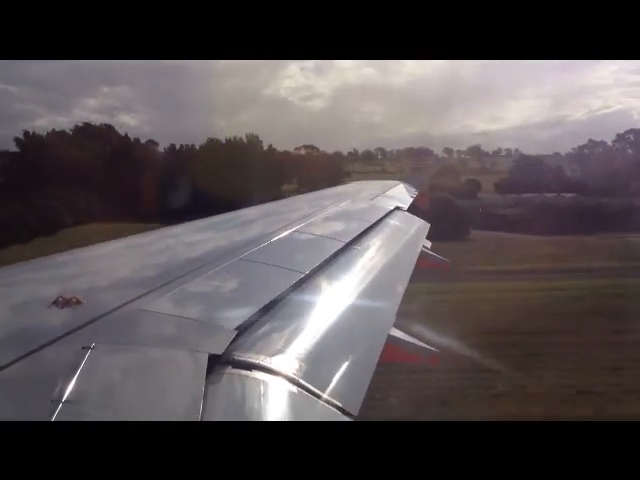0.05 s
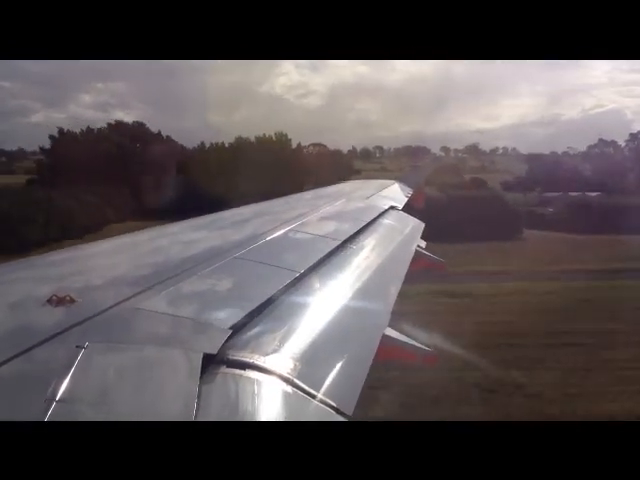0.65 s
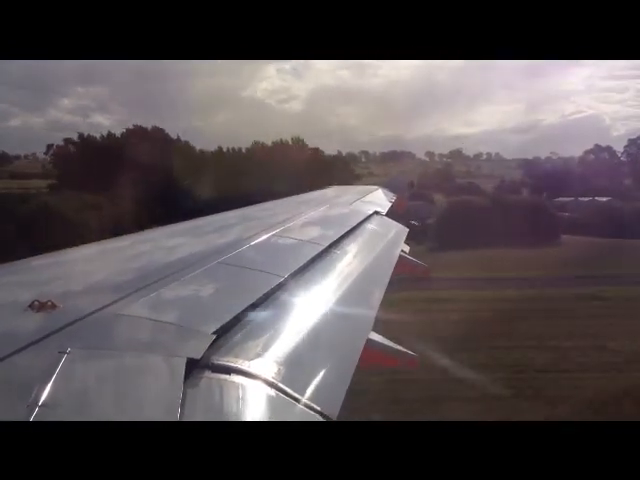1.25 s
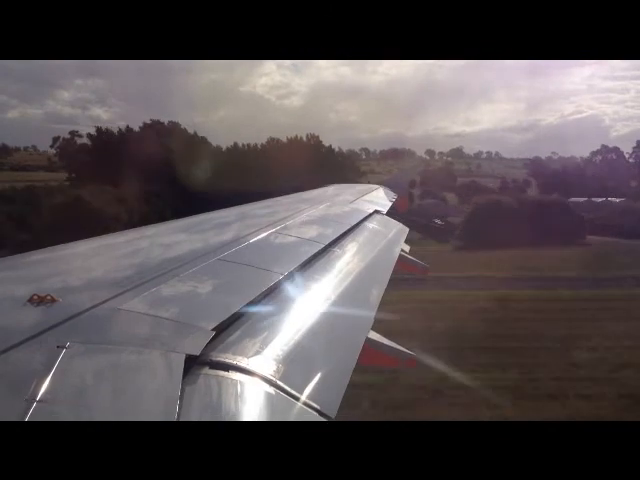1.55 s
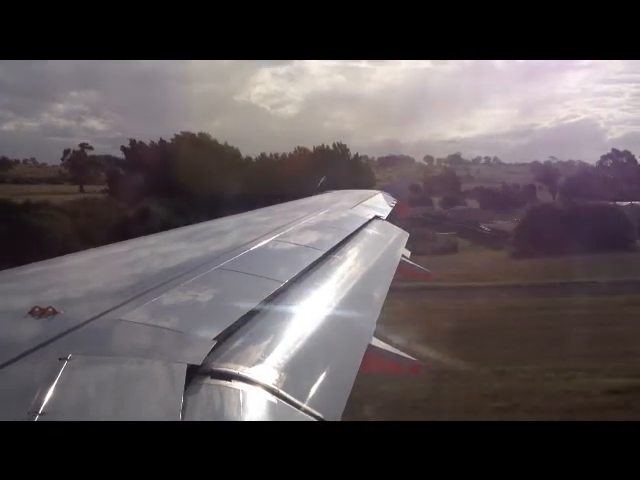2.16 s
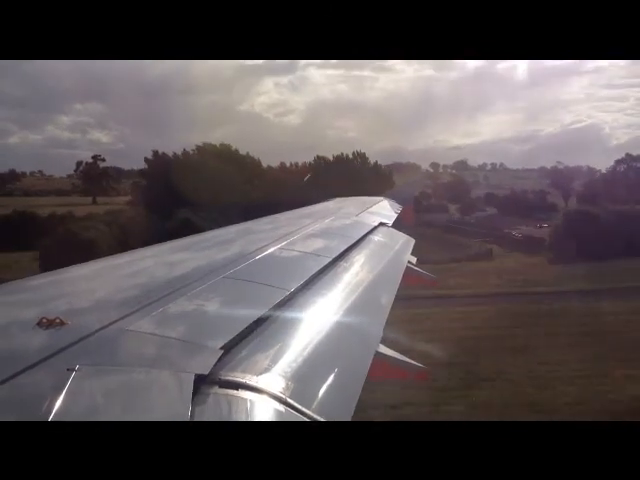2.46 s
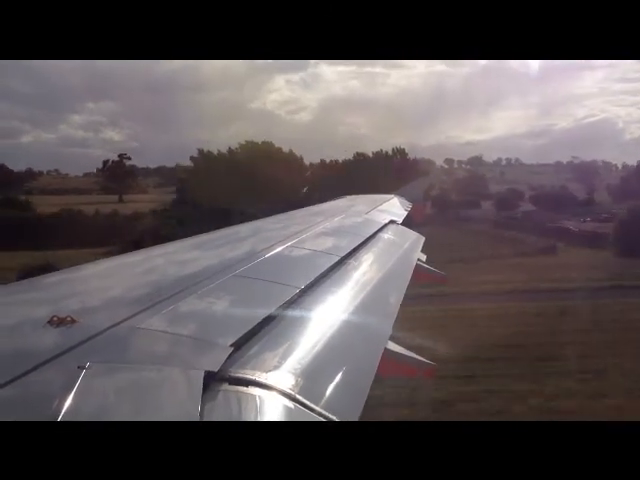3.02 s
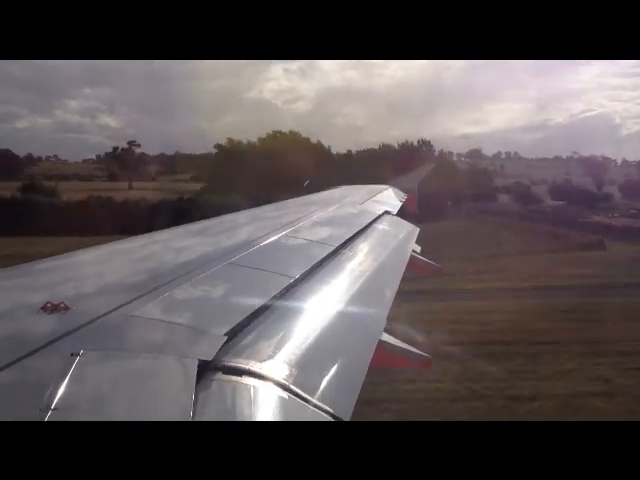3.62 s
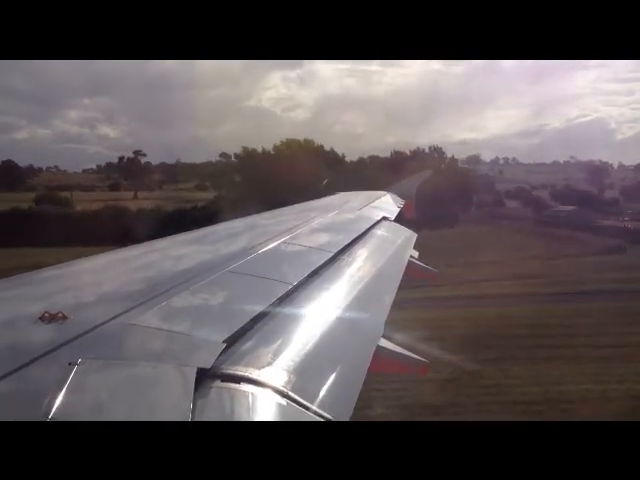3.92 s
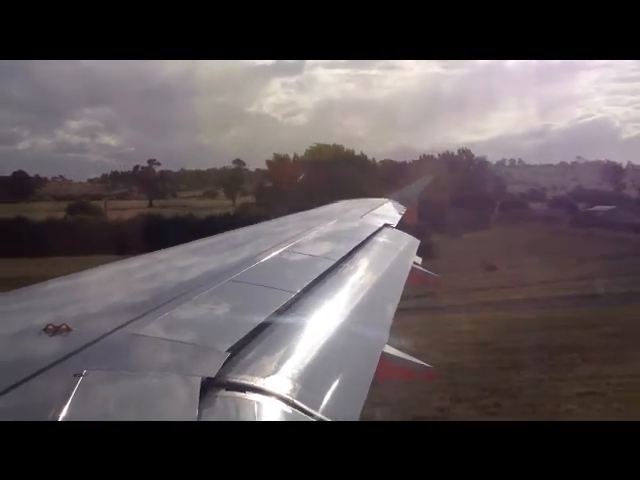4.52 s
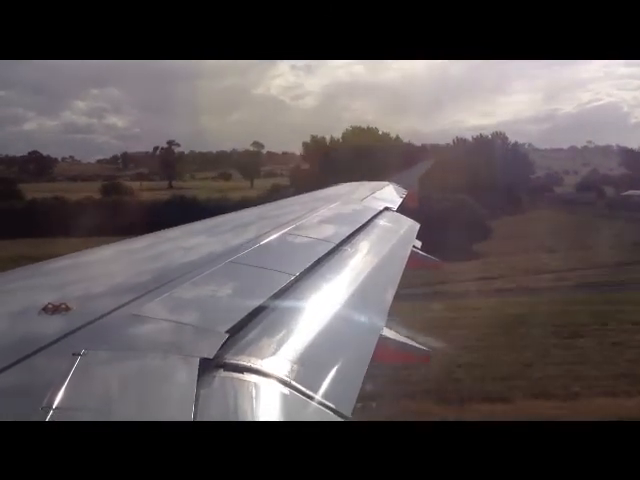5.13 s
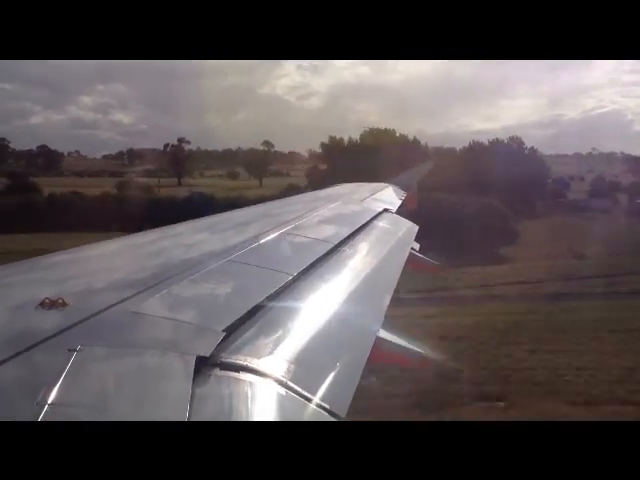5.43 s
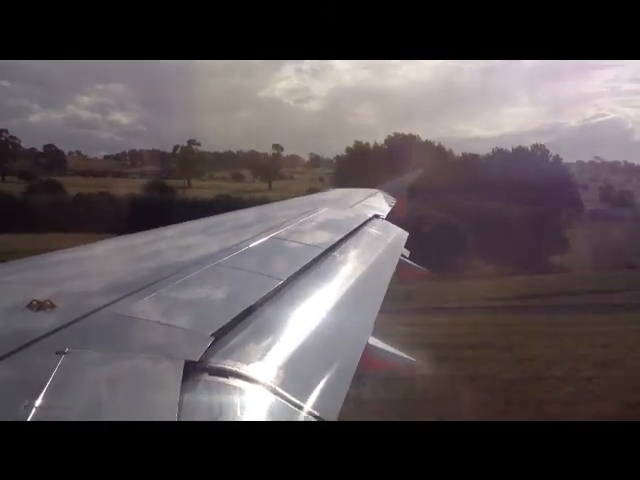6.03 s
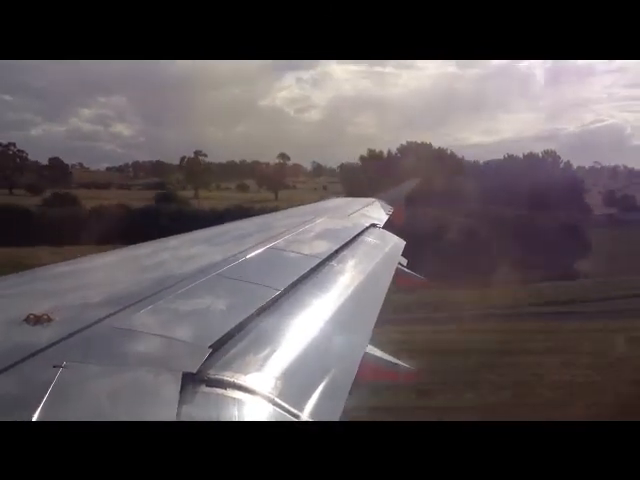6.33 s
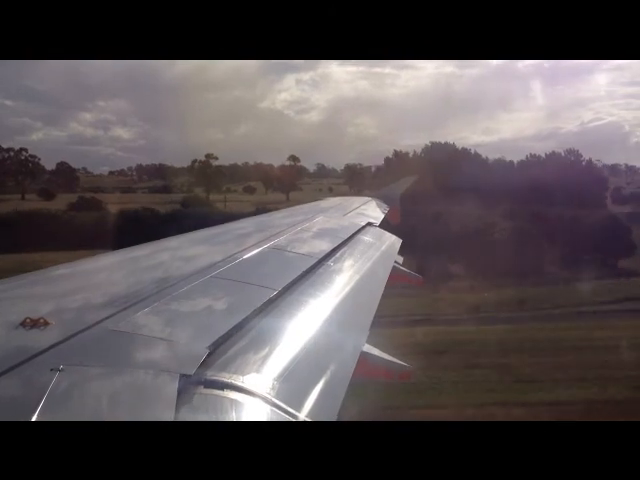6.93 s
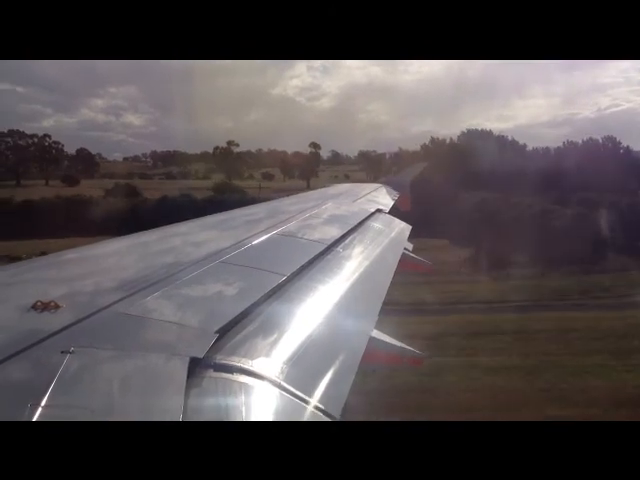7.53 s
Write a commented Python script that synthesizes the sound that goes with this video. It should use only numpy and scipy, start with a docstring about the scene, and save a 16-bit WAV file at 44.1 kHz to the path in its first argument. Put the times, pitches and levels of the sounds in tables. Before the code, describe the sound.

Inside an airliner rolling along the ground, a sharp snap and crackle of a finger on the microphone opens onto a roar of air and wheels with humming engines. Half a second later a thump covers the microphone, and everything turns much quieter and muffled. A low, slowly throbbing drone and rumble carry on, with a few soft handling bumps and faint hiss.

```python
"""A roar of air and wheels, with slowly throbbing engine tones, fills an airliner rolling on the ground.
The tones throb because two engines run almost in step. The microphone's port (its sound hole) is open
for half a second, then something, probably a finger, seals it with a thump. What stays is a muffled
drone, a few soft bumps on the case and the hiss of the microphone itself."""
import sys
import numpy as np
from scipy import signal
from scipy.fft import rfft, irfft, next_fast_len
from scipy.io import wavfile

SR = 44100
rng = np.random.default_rng(int(sys.argv[2]) if len(sys.argv) > 2 else 0)


def store_wav(level_fs):
    """Save 16-bit WAV to argv[1]."""
    pcm = np.round(np.clip(np.atleast_2d(level_fs), -1, 1) * 32767)
    wavfile.write(sys.argv[1], SR, pcm.T.astype(np.int16))


N = 342657
TIME = np.arange(N) / SR

# how the low hum heard in the roar swells and fades: time_s, gain_db
HUM_SWELL = [(0.4, 1), (0.9, -1.5), (1.3, 0), (1.8, -2.5), (2.5, 1.5), (3.3, -4.5), (3.8, -9.5),
             (4.3, -3.5), (4.65, 0), (5.2, 3.5), (6.2, 1), (6.8, -1.5), (7.6, 0)]
# how the tone an octave above the hum swells and fades: time_s, gain_db
OCTAVE_SWELL = [(0.3, 2.5), (0.9, 0), (1.7, -1), (2.7, -7), (3.1, -2), (4.1, -4), (5.1, 2.5), (7.0, 2)]
# higher tones of each engine: multiple_of_octave, level_db
ENGINE_OVERTONES = [(2, -62.5), (3, -61.5), (4, -61.5)]
# weaker tones of engines and cabin fans: pitch_hz, level_db
WHINE_TONES = [(160, -44), (313, -52), (451, -57.5), (918, -60.5), (1312, -67.5), (1873, -68.5)]
# the cabin's roar, from bass to treble: frequency_hz, level_db_per_hz
ROAR_SPECTRUM = [(22, -105), (45, -77), (65, -72), (105, -58.5), (165, -55), (260, -57), (450, -67.5),
                 (620, -77.5), (790, -76), (1000, -87.5), (2200, -86), (3000, -94), (4750, -93.5),
                 (5100, -99), (15000, -106)]
# rougher and smoother ground changes the wheel rumble: time_s, gain_db
RUMBLE_SWELL = [(0.4, -0.5), (0.7, 1.5), (1.0, -3.5), (1.42, 5), (1.7, -0.5), (4.1, 0.5), (5.05, -2.5),
                (5.8, -1.5), (6.2, -1), (6.8, -3), (7.4, 0), (7.7, -1.5)]
# air hissing from the vents: frequency_hz, level_db_per_hz
VENT_SPECTRUM = [(4000, -122), (6000, -105), (8500, -99), (11000, -106), (15000, -116)]
# the vent hiss swells briefly: time_s, gain_db
VENT_HISS_SWELL = [(.1, -1.5), (.22, 3), (.29, 8.5), (.35, 4.5), (.45, -4)]
# what gets through the sealed port: frequency_hz, gain_db
SEALED_FILTER = [(30, -7.5), (60, -12.5), (105, -18), (160, -17), (195, -21), (290, -28.5), (385, -31),
                 (620, -33.5), (800, -35.5), (930, -39), (1150, -49), (8000, -62.5)]
# the finger pushes, snaps and bumps on the case: start_s, peak_db, brightness_hz, scuff_0_to_1
FINGER_TOUCHES = [(0.03, -9, 400, 0.86), (.033, -10, 1160, 1), (0.035, -12.5, 3100, 0.9),
                  (0.0372, -9.5, 6494, 0.36), (0.0679, -14, 10860, 0.06), (0.4944, -22.5, 950, 1),
                  (0.496, -29.5, 4500, 0.83), (0.4987, -15.5, 900, 0.14), (0.503, -24.5, 700, 0.5),
                  (0.731, -42.5, 516, 0.2), (1.085, -44, 620, 0.4), (1.237, -47.5, 506, 0.3),
                  (1.249, -49.5, 1010, 0), (1.274, -54, 1800, 0.2), (1.286, -37.5, 147, 0.7),
                  (1.344, -44, 161, 0), (1.478, -37, 170, 0.28), (2.09, -42, 301, 0.2),
                  (3.373, -46.5, 419, 0.4), (3.564, -35, 345, 0.11), (4.076, -41, 170, 0.07),
                  (4.25, -58.5, 800, 0.27), (5.71, -42.5, 236, 0.23), (5.96, -42.5, 362, 0.14),
                  (6.078, -39, 250, 0.06), (6.181, -51, 812, 0), (6.188, -44.5, 594, 0.4),
                  (7.239, -52, 449, 0.18)]
# the case's low thud and a faint, higher hollow ring at each touch: pitch_hz, width_hz, gain_db
TOUCH_RINGS = [(175, 450, 6.5), (810, 120, -16.5)]
# tone colour of the crackle of peeling skin: frequency_hz, gain_db
CRACKLE_FILTER = [(500, 1.5), (2000, 3), (5500, 1), (8200, 5), (11000, -8.5), (15000, -15.5)]
# the microphone's own hiss: frequency_hz, level_db_per_hz
MIC_HISS_SPECTRUM = [(100, -112), (1000, -114), (2100, -117), (4500, -119), (9000, -120), (15400, -119)]
# the dip in the microphone's treble: frequency_hz, gain_db
MIC_FILTER = [(6800, 0), (8200, -4), (9700, -9), (12000, -2.5), (14300, 0.5)]

SEAL_S = 0.495  # the finger starts to close the port
TREBLE_LIMIT_HZ = 15450


def engines(hum_hz=191.8, hum_db=-38, octave_db=-39, beat_hz=1.14, beat_rise_hz_per_s=0.09):
    """Two engines slip in and out of step, so their shared tones throb (beat) over a wavering hum."""
    speed = 1 + 0.00072 * drift(1.6)
    hum = shaft_tone(hum_hz, hum_db, speed) * level(HUM_SWELL) * amp(1.78 * drift(6))
    near_cycles = 2 * hum_hz * np.cumsum(speed) / SR + rng.random()
    # the far engine runs slightly faster and keeps gaining, so the throb quickens
    far_cycles = near_cycles + np.cumsum(beat_hz + beat_rise_hz_per_s * TIME) / SR
    octave = amp(octave_db) * (np.sin(2 * np.pi * near_cycles) + np.sin(2 * np.pi * far_cycles))
    overtones = sum(amp(db) * np.sin(2 * np.pi * (round(multiple) * cycles + rng.random()))
                    for multiple, db in ENGINE_OVERTONES for cycles in (near_cycles, far_cycles))
    whines = sum(shaft_tone(hz, db, speed) * amp(1.9 * drift(2.1)) for hz, db in WHINE_TONES)
    return hum + np.sqrt(2) * (octave * level(OCTAVE_SWELL) + overtones) + whines


def shaft_tone(hz, db, speed):
    """One pure tone whose pitch follows the speed of the spinning shaft."""
    cycles = hz * np.cumsum(speed) / SR + rng.random()
    return np.sqrt(2) * amp(db) * np.sin(2 * np.pi * cycles)


def cabin_roar(shake_db=1.32, flutter_db=2.7):
    """The wheels shake the low rumble, the rush of air above it flutters, and the vents hiss."""
    roar = noise(ROAR_SPECTRUM)
    rumble = bass_of(roar, hz=420, order=2)
    vents = noise(VENT_SPECTRUM) * level(VENT_HISS_SWELL)
    wheels = rumble * level(RUMBLE_SWELL) * amp(shake_db * drift(35))
    air = (roar - rumble) * amp(flutter_db * drift(24))
    return wheels + air + vents


def through_port(cabin, ajar_db=-5, open_s=0.023, closing_db_per_s=225):
    """The port opens as the finger lifts, then closes as it presses, leaving only a muffled sound."""
    opening_db = ajar_db * np.maximum(1 - (TIME / open_s) ** 2, 0)
    leak = amp(opening_db - closing_db_per_s * np.clip(TIME - SEAL_S, 0, 1))
    treble_leak = leak ** 3.3  # a narrowing gap shuts out treble faster than bass
    bass = bass_of(cabin, hz=620, order=1)
    muffled = colour(cabin, SEALED_FILTER)
    return leak * bass + treble_leak * (cabin - bass) + (1 - leak) * muffled


def finger_touches(scuff_s=0.0037):
    """Each touch is a pulse of pressure with a short scuff of skin, rounded off by the soft fingertip."""
    out = np.zeros(N)
    t = np.arange(2048) / SR
    for start_s, peak_db, brightness_hz, scuff in FINGER_TOUCHES:
        grit = rng.standard_normal(len(t)) * np.exp(-t / scuff_s)
        push = (t == 0) + 2 * scuff * grit / np.linalg.norm(grit)
        rounded = keep_side(push, "low", hz=brightness_hz, order=4)
        knock = keep_side(rounded, "high", hz=85, order=3)
        ring = sum(amp(db) * signal.lfilter(*signal.iirpeak(hz, hz / width_hz, SR), knock)
                   for hz, width_hz, db in TOUCH_RINGS)
        bump = knock + ring
        slot = out[round(start_s * SR):][:len(t)]
        slot += amp(peak_db) * bump[:len(slot)] / abs(bump).max()
    return out


def skin_peel(start_s=0.039, end_s=0.065, clicks_per_s=1100, level_db=-38):
    """Skin lets go of the case in a quick run of tiny clicks."""
    length_s = end_s - start_s
    times_s = rng.uniform(start_s, end_s, round(clicks_per_s * length_s))
    clicks = np.bincount((times_s * SR).astype(int), rng.standard_normal(len(times_s)), N)
    crackle = colour(clicks, CRACKLE_FILTER)
    return amp(level_db) * crackle * np.sqrt(length_s * SR) / np.linalg.norm(crackle)


def fingertip_rub(start_db=-60, fade_db_per_s=140):
    """The fingertip settles on the port with a dull rub that dies away."""
    dull_noise = keep_side(rng.standard_normal(N), "low", hz=850, order=3)
    rub = keep_side(dull_noise, "high", hz=480, order=3)
    fade = amp(start_db - fade_db_per_s * np.clip(TIME - SEAL_S, 0, 1))
    return (TIME > SEAL_S) * fade * rub / rub.std()


def ground_jolts(jolts_per_s=60, level_db=-70):
    """Uneven ground sends small dull jolts through the seat and hand into the case."""
    blows = rng.uniform(-0.72, 1, N) * (rng.random(N) < jolts_per_s / SR)
    softened = keep_side(blows, "low", hz=280, order=4)
    thuds = keep_side(softened, "high", hz=190, order=2)
    return amp(level_db) * thuds / thuds.std()


def amp(db):
    """Turns decibels into a number to multiply a sound by."""
    return 10 ** (np.asarray(db) / 20)


def level(curve):
    """A volume curve that joins (time_s, gain_db) points."""
    return amp(np.interp(TIME, *np.transpose(curve)))


def drift(fastest_hz, count=16):
    """A smooth random wobble, typically about 1 in size, made by adding slow waves."""
    rates_hz = np.geomspace(fastest_hz / 10, fastest_hz, count)
    times_s = TIME[::256]
    waves = np.sin(2 * np.pi * (np.outer(times_s, rates_hz) + rng.random(count)))
    wobble = (waves / np.sqrt(rates_hz)).sum(1)
    return np.interp(TIME, times_s, wobble / wobble.std())


def noise(spectrum):
    """Steady noise shaped by (frequency_hz, level_db_per_hz) points."""
    return colour(rng.standard_normal(N) * np.sqrt(SR / 2), spectrum)


def colour(sound, points):
    """Turns each frequency up or down, following (frequency_hz, gain_db) points."""
    hz, db = np.transpose(points)
    size = next_fast_len(len(sound) + 4096)
    frequencies_hz = np.fft.rfftfreq(size, 1 / SR)
    gain = amp(np.interp(np.log(frequencies_hz + 1), np.log(hz), db))
    return irfft(rfft(sound, size) * gain, size)[:len(sound)]


def bass_of(sound, hz, order):
    """The part below hz, with no delay, so subtracting it leaves the treble."""
    return signal.sosfiltfilt(signal.butter(order, hz, fs=SR, output="sos"), sound)


def keep_side(sound, side, hz, order):
    """Keeps the "low" or "high" side of hz; a higher order cuts more sharply."""
    return signal.sosfilt(signal.butter(order, hz, side, fs=SR, output="sos"), sound)


def scene():
    """The cabin heard through the port, plus what reaches the case by touch."""
    cabin = through_port(engines() + cabin_roar())
    return (cabin + finger_touches() + skin_peel() + ground_jolts() + fingertip_rub())[None]


def record(dry):
    """The microphone adds its hiss, dips the treble and cuts off the very highest sounds."""
    heard = colour(dry[0] + noise(MIC_HISS_SPECTRUM), MIC_FILTER)
    treble_cut = signal.firwin(511, TREBLE_LIMIT_HZ, window=("kaiser", 9), fs=SR)
    return signal.oaconvolve(heard, treble_cut, "same")[None]


dry = scene()
out = record(dry)
store_wav(out)
```